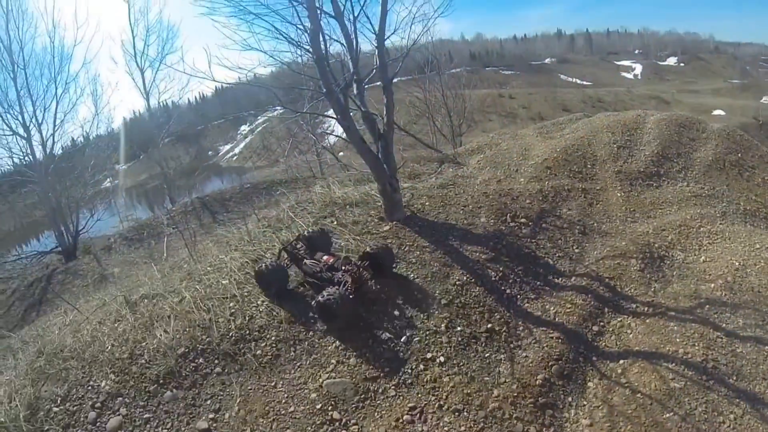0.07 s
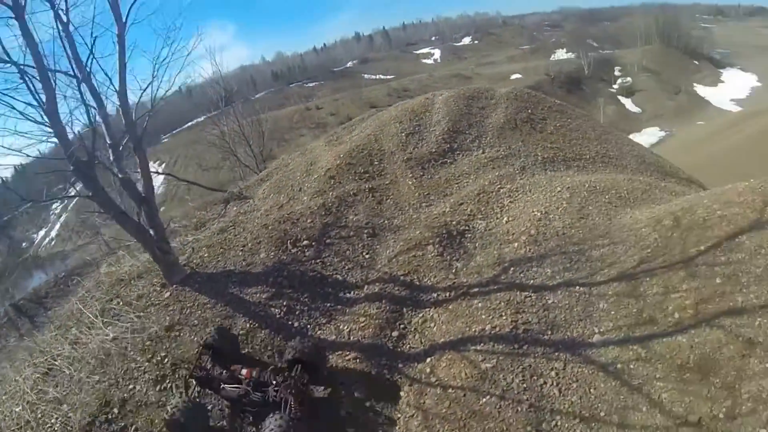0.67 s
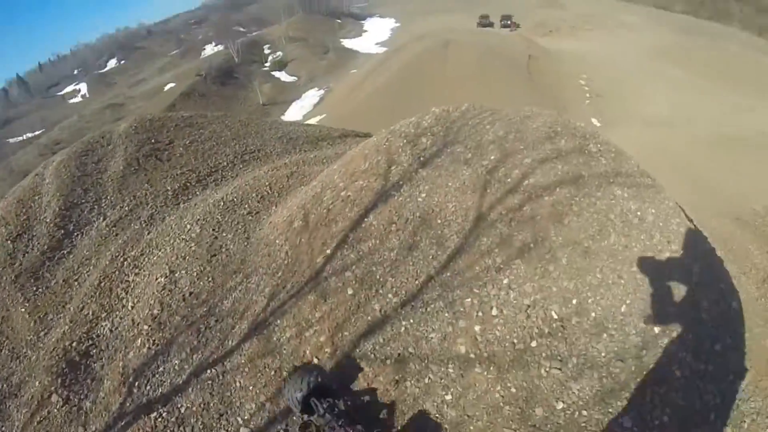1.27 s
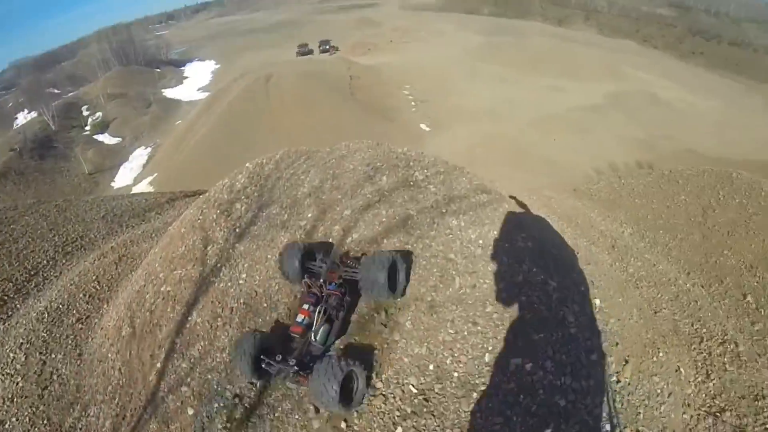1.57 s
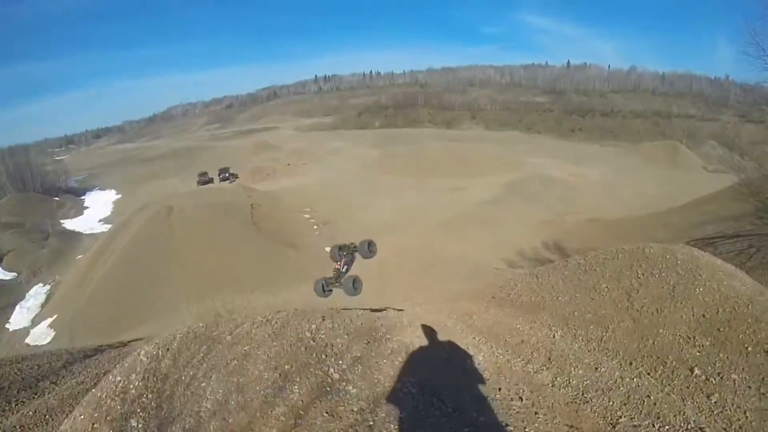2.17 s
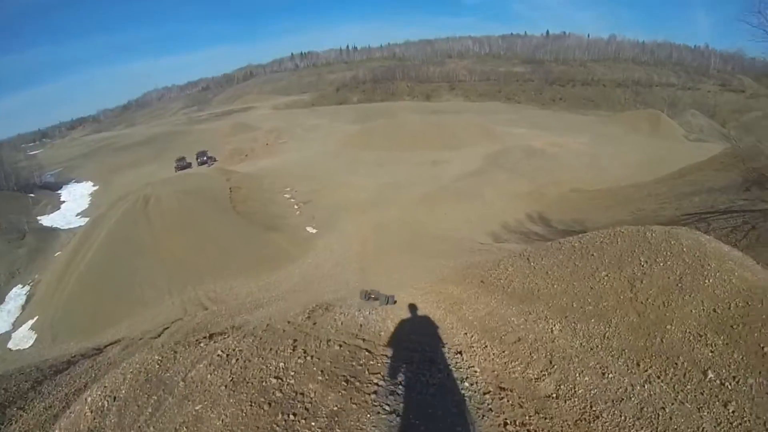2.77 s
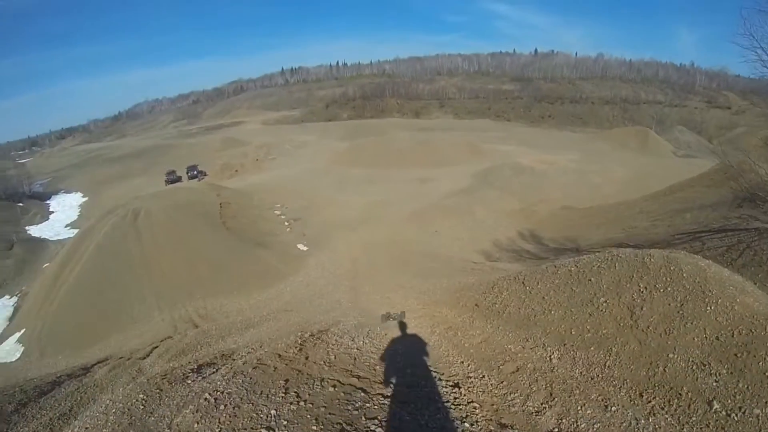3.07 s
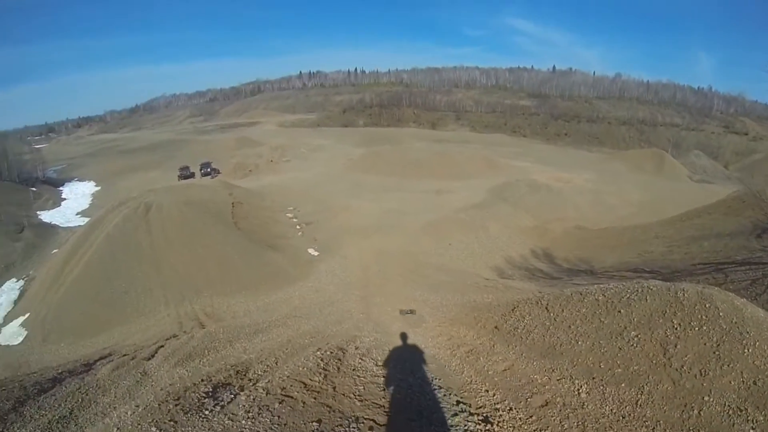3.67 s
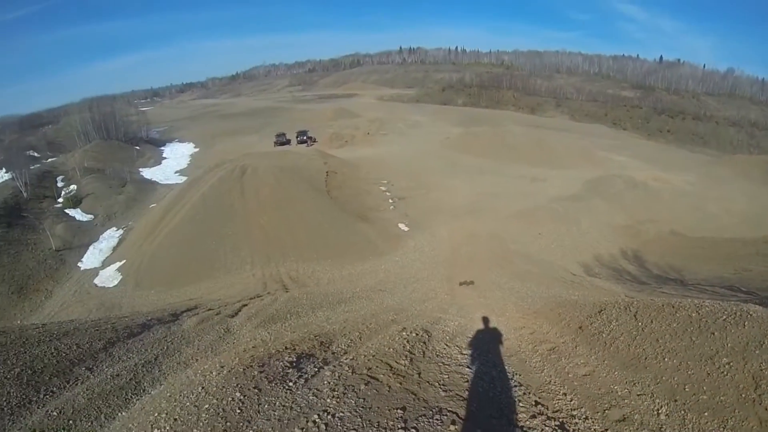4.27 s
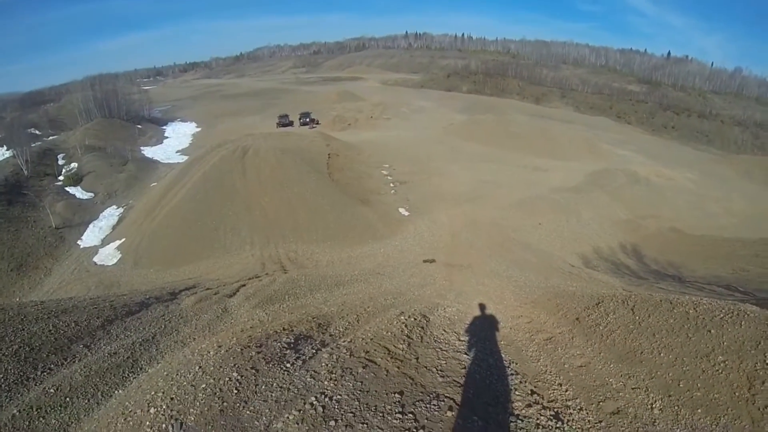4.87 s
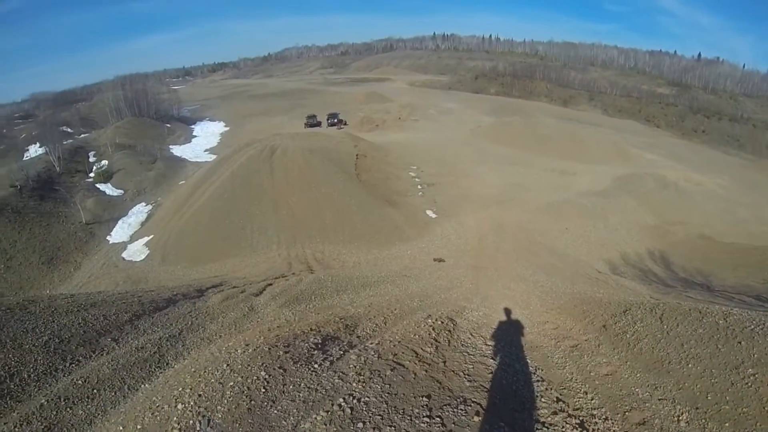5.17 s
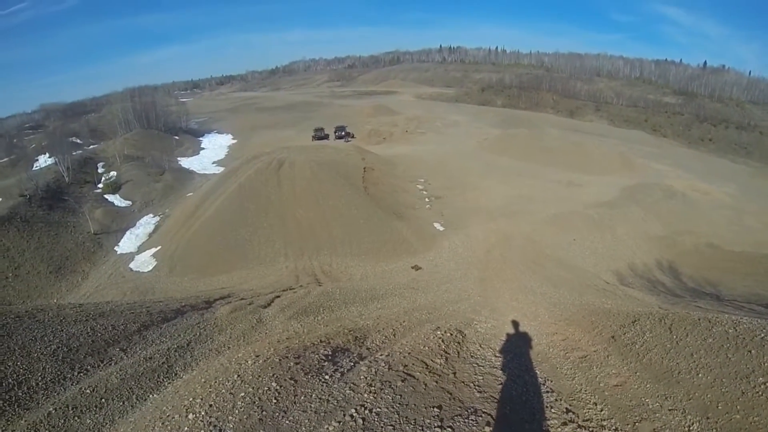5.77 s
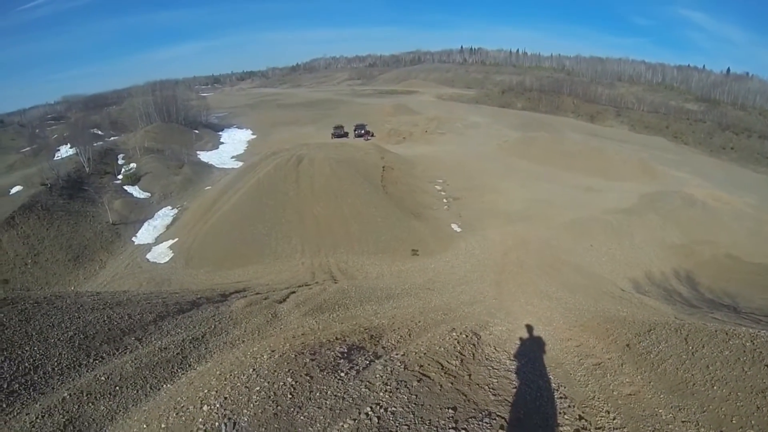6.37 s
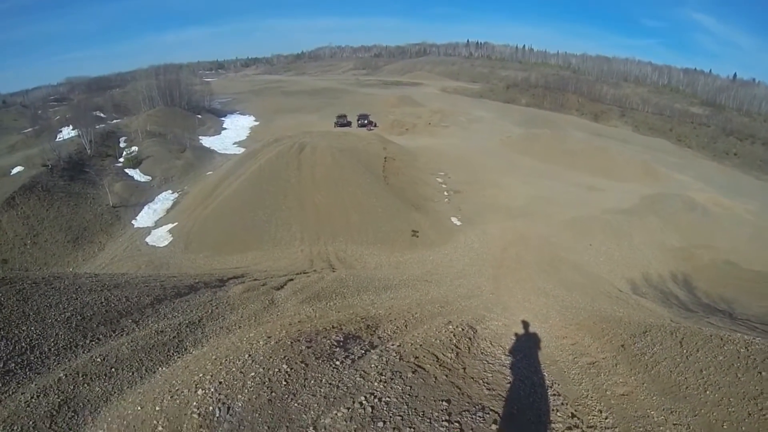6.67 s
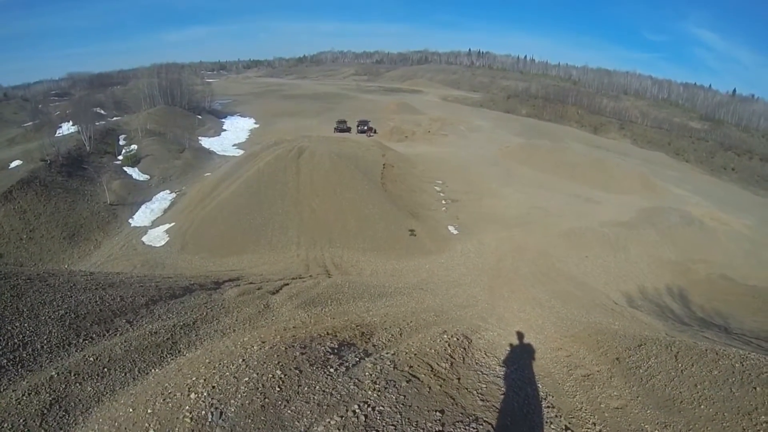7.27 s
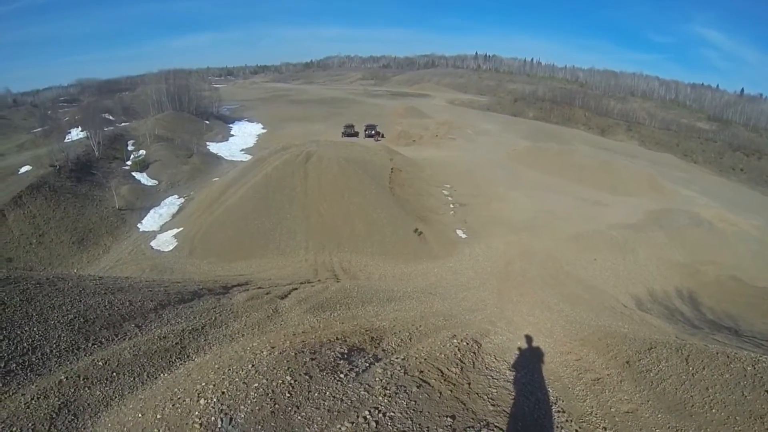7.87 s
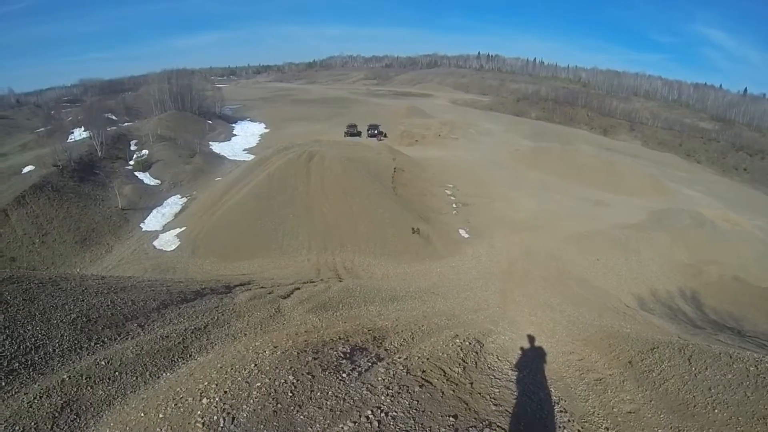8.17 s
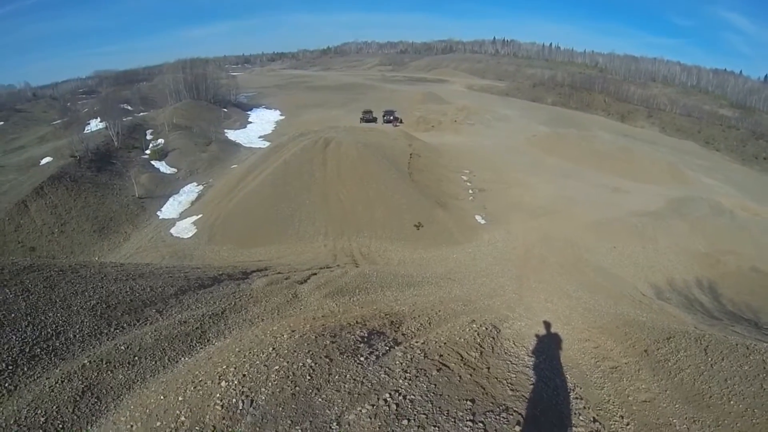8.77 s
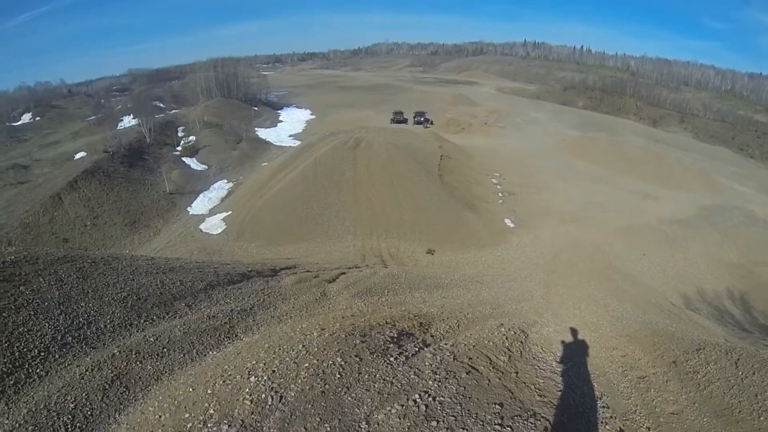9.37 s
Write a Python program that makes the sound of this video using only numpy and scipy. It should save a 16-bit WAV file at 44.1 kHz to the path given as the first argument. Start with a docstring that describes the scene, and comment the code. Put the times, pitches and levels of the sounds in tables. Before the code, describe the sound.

A small electric model truck whines and rattles over gravel, jumps, then revs far off amid microphone knocks and wind.

```python
"""A sand pit: a small electric model truck climbs a gravel mound beside a body-worn camera, jumps,
and drives on far off. Its gears whine and rattle through the camera's ringing plastic case; its tyres
churn gravel and spray grit. Knocks and clicks reach the case from its mount, wind rumbles on it,
and the electronics buzz faintly."""
import sys
import numpy as np
from scipy import signal
from scipy.fft import rfft, irfft
from scipy.io import wavfile
from scipy.ndimage import uniform_filter1d

SR = 44100
rng = np.random.default_rng(int(sys.argv[2]) if len(sys.argv) > 2 else 0)


def wav_out(sig):
    """Save sig, one row per channel (or a flat mono array), as 16-bit PCM at SR to the path in sys.argv[1]."""
    wavfile.write(sys.argv[1], SR, np.round(np.clip(np.atleast_2d(sig).T, -1, 1) * 32767).astype(np.int16))


N = 415863
T = np.arange(N) / SR
TOP_HZ = 15100

# motor on the climb and jump: (time [s], gear mesh pitch before wheel drag [Hz], drive [dB])
CLIMB = [(.28, 440, -50), (.41, 710, -42), (.47, 860, -36.5), (.645, 950, -33), (.67, 1050, -36),
         (.822, 1100, -36), (.834, 1280, -31), (.93, 1420, -31), (.974, 1660, -28.5), (1.052, 1500, -30.5),
         (1.14, 1920, -22.5), (1.18, 1850, -29.5), (1.29, 1800, -26), (1.35, 1980, -29), (1.43, 1930, -23),
         (1.5, 2111, -16), (1.57, 2750, -20.5), (1.61, 3400, -28), (1.66, 4200, -22.5), (1.71, 4900, -28),
         (1.85, 4500, -39), (1.99, 4200, -29.5)]
# throttle bursts after take-off: (start [s], length [s], pitch from [Hz], pitch towards [Hz],
# time to halfway [s], drive [dB], overtone boost [dB], judder [share of speed])
REVS = [(1.99, 0.12, 4200, 1000, 0.038, -35.5, 4, .06), (2.359, 0.37, 1925, 2970, 0.11, -45, 5.5, .05),
        (5.73, 0.83, 2250, 2950, .25, -58, 6, .1), (6.365, 0.3, 2124, 1590, .11, -52.5, 7.5, 0.054),
        (7.082, .15, 1353, 1997, 0.055, -59, 3, .025), (7.319, 0.86, 1250, 3670, .35, -50, -7, .012),
        (8.414, 0.19, 1216, 1747, 0.12, -54, 4, .03), (8.732, 0.68, 1195, 2320, .175, -59, 8, .02)]


def undb(db):
    """Decibels to gain."""
    return 10 ** (np.asarray(db) / 20)


def unit(x):
    """Scale to rms 1."""
    return x / np.sqrt(np.mean(x ** 2))


def curves(table):
    """Table columns, interpolated linearly in time."""
    s, *columns = np.transpose(table)
    return [np.interp(T, s, c) for c in columns]


def during(table):
    """Soft-edged gate from a table's first time to its last."""
    return uniform_filter1d(1. * ((T >= table[0][0]) & (T <= table[-1][0])), size=800)


def swell(centre_s, length_s):
    """Half-cosine rise and fall."""
    return np.cos(np.pi * np.clip((T - centre_s) / length_s, -.5, .5))


def walk(rate_hz):
    """Smooth random wander, rms 1."""
    hold = max(int(SR / rate_hz), 2)
    steps = np.repeat(rng.standard_normal(N // hold + 1), hold)[:N]
    return unit(uniform_filter1d(steps, hold))


def grains(per_s, spread_db):
    """Dense tiny impacts, a few much larger than the rest."""
    size = undb(spread_db * np.minimum(rng.exponential(size=N), 5))
    return unit((rng.random(N) < per_s / SR) * size * rng.standard_normal(N))


def add(out, start_s, sound):
    """Mix a sound into out."""
    i = int(start_s * SR)
    out[i:i + len(sound)] += sound[:N - i]


def colour(x, points, size=8192):
    """Minimum-phase filter through (frequency [Hz], gain [dB]) points."""
    hz, db = np.transpose(points)
    bins_hz = np.maximum(np.fft.rfftfreq(size, 1 / SR), 1)
    gain = undb(np.interp(np.log(bins_hz), np.log(hz), db))
    cepstrum = irfft(np.log(gain))
    cepstrum[1:size // 2] *= 2
    cepstrum[size // 2 + 1:] = 0
    return signal.oaconvolve(x, irfft(np.exp(rfft(cepstrum))))[:len(x)]


def resonate(x, modes):
    """Parallel resonances of alternating sign: (frequency [Hz], width [Hz], gain [dB])."""
    return sum((-1) ** k * undb(db) * signal.lfilter(*signal.iirpeak(hz, hz / width_hz, fs=SR), x)
               for k, (hz, width_hz, db) in enumerate(modes))


def case(x, leak_db=-33):
    """The plastic case rings at its resonances and passes little else."""
    # air and wall modes: (frequency [Hz], width [Hz], gain [dB])
    modes = [(1341, 116, 5), (1468, 93, 7), (1583, 92, 4), (1808, 143, -4.5), (2130, 190, -17),
             (2284, 630, -20), (2720, 160, -19.5), (3265, 270, -19), (3840, 330, -16), (4054, 274, -13),
             (4327, 200, -18.5), (5730, 1000, -22), (6210, 160, -24), (7600, 340, -49), (9900, 650, -40)]
    return resonate(x, modes) + undb(leak_db) * x


def electronics(hiss_db=-67, frame_hz=59.94, on_s=.007):
    """Steady hiss and a thin whistle that restarts with each camera frame."""
    # whistle partials: (frequency [Hz], level [dB])
    partials = [(5715, -68.7), (11430, -81.5)]
    # hiss spectrum: (frequency [Hz], density [dB])
    hiss_shape = [(100, 11), (500, 10), (1000, 7), (1500, -4), (2100, 2.5), (4200, -2.5), (6700, -4.5),
                  (7800, -26), (9800, -11.5), (11300, -10.5), (12500, -32), (15000, -47)]
    in_frame_s = T % (1 / frame_hz)
    gate = uniform_filter1d(1. * (in_frame_s < on_s), size=80)
    drift_rad = .75 * walk(30)
    whistle = sum(undb(db) * np.sin(2 * np.pi * hz * in_frame_s + drift_rad) for hz, db in partials)
    return gate * whistle + undb(hiss_db) * unit(colour(rng.standard_normal(N), hiss_shape))


def wind(rumble_db=1, buffet_db=-12, flutter_db=3):
    """Slow eddies rumble on the case; quicker ones buffet it, most in gusts."""
    # breeze: (time [s], level [dB])
    levels = [(0, -52.5), (.9, -42.5), (1.5, -47.5), (2.1, -43), (3.3, -46), (4.4, -45), (5.9, -49.5),
              (6.7, -45.5), (7.1, -50.5), (7.7, -51.5), (8.5, -43), (9.43, -49.5)]
    # gusts: (centre [s], length [s], rumble [dB], buffeting [dB])
    gusts = [(0.863, 0.24, -44, -51), (1.104, 0.11, -43, -40), (1.71, 0.66, -50, -48),
             (1.99, 0.34, -34, -45), (2.31, .1, -36, -55), (2.664, 0.4, -31.5, -39),
             (3.51, 0.15, -47, -45.5), (6.62, 0.41, -56.5, -49.5), (7.957, 0.13, -46, -46)]
    # eddy spectra: (frequency [Hz], density [dB])
    rumble_shape = [(8, -6.5), (22, 3), (40, -8), (70, -17), (130, -20.5), (300, -70)]
    buffet_shape = [(40, -16), (80, -6.5), (140, 1.5), (240, -2.5), (330, -12), (450, -19.5), (800, -30.5),
                    (1500, -58.5)]
    breeze = undb(curves(levels)[0])
    rumble, buffet = breeze * undb(rumble_db), breeze * undb(buffet_db)
    for s, length_s, low_db, high_db in gusts:
        gust = swell(s, length_s)
        rumble = np.hypot(rumble, undb(low_db) * gust)
        buffet = np.hypot(buffet, undb(high_db) * gust)
    low = unit(colour(rng.standard_normal(N), rumble_shape)) * rumble * undb(flutter_db * walk(9))
    high = unit(colour(rng.standard_normal(N), buffet_shape)) * buffet * undb(flutter_db * walk(25))
    return low + high


def sizzle(hz=7750, width_hz=650):
    """A faint, narrow band of high hiss."""
    # sizzle: (time [s], level [dB])
    levels = [(2.2, -77), (2.4, -75), (3.3, -80.5), (3.6, -77), (6.3, -80)]
    return unit(resonate(grains(1500, 3.5), [(hz, width_hz, 0)])) * undb(curves(levels)[0])


def knocks(clack_s=.001, ring_s=.013, ring_db=-12):
    """Each knock pushes the mount into a short boom; the case clacks and rings."""
    # soft knocks: (time [s], thud peak [dB], push length [ms], clack peak [dB])
    hits = [(0.373, -29.5, 3.4, -39), (.378, -20.5, 11, -33.5), (0.736, -25.5, 3, -54),
            (0.747, -25, 11.2, -44), (1.082, -28, 6.4, -53), (1.205, -35, 9.9, -60), (1.802, -8, 4.9, -25),
            (1.983, -20, 7.8, -43), (2.153, -22, 8, -43), (2.187, -28, 3.5, -46),
            (2.564, -12.5, 8.4, -30.5), (2.644, -17.5, 6.4, -28), (3.498, -13, 4.2, -39.5),
            (3.545, -29.5, 2.6, -65), (3.713, -27, 3.5, -47), (3.942, -31, 5.2, -52),
            (4.081, -28.5, 5.7, -50), (4.441, -32.5, 7, -49), (4.512, -23.5, 3, -30),
            (4.521, -15.5, 6.6, -44), (4.869, -23, 3.1, -31), (4.879, -17.5, 12.2, -55),
            (6.535, -6, 4.3, -26), (6.554, -25.5, 3, -41), (6.65, -15, 2.5, -28.5), (6.804, -28, 3.8, -40),
            (6.827, -29, 5.9, -47), (7.94, -43, 3.8, -51), (8.168, -38, 5.2, -50), (8.481, -38, 2.9, -60),
            (9.15, -37, 4.5, -62), (9.311, -27, 12.2, -67)]
    # mount modes: (frequency [Hz], t60 [s], level [dB])
    modes = [(41.9, 0.21, -14.5), (79, 0.064, -10), (145, 0.063, -2.5), (218, 0.028, 6.5),
             (288, .035, -24.5), (605, 0.026, -3.5)]
    # case clack spectrum: (frequency [Hz], density [dB])
    clack_shape = [(100, 6), (400, 3), (750, -5.5), (1000, -6), (1550, 10.5), (1800, -7), (2100, -17),
                   (3800, -21), (5000, -29), (8000, -35.5), (14000, -48)]
    t, out = T[:SR // 5], np.zeros(N)
    boom = sum(undb(db - 60 * t / t60_s) * np.cos(2 * np.pi * hz * t) for hz, t60_s, db in modes)
    decay = np.exp(-t / clack_s) + undb(ring_db) * np.exp(-t / ring_s)
    for s, thud_db, push_ms, clack_db in hits:
        push = np.sin(np.pi * np.minimum(t * 1000 / push_ms, 1)) ** 2
        thud = signal.fftconvolve(push, boom)[:len(t)]
        clack = colour(rng.standard_normal(len(t)) * decay, clack_shape)
        add(out, s, undb(clack_db) * clack / abs(clack).max() - undb(thud_db) * thud / abs(thud).max())
    return out


def clicks(crack_s=.0019, ring_gain=1.26):
    """Small hard contacts on the plastic: a crack and a brief ring."""
    # contacts: (time [s], peak [dB], relative case ring [dB])
    hits = [(1.962, -30, -6), (1.966, -29, -6), (1.971, -21.5, -14), (2.034, -26, -11), (2.149, -30.5, -12),
            (2.175, -40, -16), (2.528, -35, -7), (2.541, -32.5, 8), (2.579, -34, 7), (2.634, -31, 20),
            (2.65, -22.5, 6), (2.661, -18.5, 3), (2.669, -20, -10), (2.677, -34, 11), (2.717, -33, 6),
            (2.732, -24, -13), (2.737, -11, -2), (2.809, -35.5, 2), (2.9194, -24, -8), (2.933, -35, 1),
            (2.942, -32.5, 2), (3.055, -41.5, 12), (3.669, -37.5, -1), (4.338, -40.5, 10), (4.891, -39, 8)]
    # crack spectrum: (frequency [Hz], density [dB])
    crack_shape = [(150, 12.5), (500, 9.5), (1000, 6), (1550, 14), (2100, -4), (3200, 2.5), (4200, -1.5),
                   (5200, -8), (7800, -8), (12000, -22), (15500, -25)]
    t, out = T[:SR // 16], np.zeros(N)
    for s, peak_db, ring_db in hits:
        crack = rng.standard_normal(len(t)) * np.exp(-t / crack_s)
        click = colour(crack, crack_shape) + ring_gain * undb(ring_db) * case(crack)
        add(out, s, undb(peak_db) * click / abs(click).max())
    return out


def backlash(top_hz=6500):
    """Loose gear teeth tick densely and ring the case."""
    ticks = case(grains(3000, 2.3))
    return unit(signal.lfilter(*signal.butter(2, top_hz, fs=SR), ticks))


def far_truck(sand_trim_db=-7, bump_db=2):
    """Far off, tyres and gearbox blur into a soft rasp that swells in each skid."""
    # rolling in the pit: (time [s], churning sand [dB], gearbox rattle [dB])
    levels = [(2.25, -68, -66.5), (2.42, -53, -54), (2.95, -62, -59.5), (3.3, -65.5, -65.5),
              (3.62, -63, -66.5), (4.3, -64, -69.5), (5.6, -67, -69), (6.45, -63.5, -62.5),
              (6.75, -71, -68.5), (7.8, -65, -63), (7.95, -63.5, -57), (8.1, -64.5, -63.5),
              (8.65, -75, -64.5), (9.2, -68, -60.5), (9.46, -78, -65)]
    # skids: (centre [s], length [s], level [dB])
    skids = [(5.754, 0.041, -68), (5.82, 0.037, -66), (6.031, 0.069, -70), (6.13, 0.1, -69),
             (6.379, 0.077, -70), (9.365, 0.25, -62)]
    # sand spectrum: (frequency [Hz], density [dB])
    sand_shape = [(1000, -44), (2100, 6.5), (2800, 10), (3500, 8), (4150, 10.5), (4900, 2), (6500, -2.5),
                  (9000, -14.5)]
    sand_db, rattle_db = curves(levels)
    skidding = sum(undb(db) * swell(s, length_s) for s, length_s, db in skids)
    rasp = unit(colour(grains(5000, 1), sand_shape)) * (undb(sand_db + sand_trim_db) + skidding)
    return (rasp + backlash() * undb(rattle_db)) * undb(bump_db * walk(30)) * during(levels)


def near_truck(churn_trim_db=-5.5, bump_db=2, spray_db=-58.5, spray_flutter_db=3):
    """Close by, tyres churn gravel and fling grit; loose gear teeth rattle."""
    # the pass: (time [s], churning gravel [dB], gearbox rattle [dB])
    levels = [(0, -57, -53), (.15, -62, -55.5), (.36, -49, -43.5), (.46, -52.5, -50.5), (.7, -48.5, -45.5),
              (1.0, -44.5, -41.5), (1.1, -42, -34.5), (1.42, -42, -45.5), (1.58, -37.5, -38),
              (1.65, -36.5, -31.5), (1.72, -35.5, -34.5), (1.88, -46, -40.5), (2.06, -40.5, -39),
              (2.13, -52.5, -56), (2.25, -70, -67)]
    # handfuls of grit: (centre [s], length [s], level [dB])
    flings = [(1.067, 0.039, -52.5), (1.353, 0.023, -47.5), (1.43, 0.067, -60), (1.642, 0.5, -55.5),
              (1.964, 0.025, -38.5), (2.012, .03, -52)]
    # gravel and grit spectra: (frequency [Hz], density [dB])
    gravel_shape = [(300, -21), (700, -3.5), (1050, 3), (1800, 12.5), (2100, -24), (2700, 6), (3400, -0.5),
                    (4100, -2.5), (4900, -11.5), (6300, -13), (7200, -24), (9000, -20.5)]
    grit_shape = [(3000, 9), (5000, 7.5), (6500, 6), (8500, 0), (9800, -16), (10600, -1), (11400, 2),
                  (12500, -9), (14200, -5), (16000, -28)]
    churn_db, rattle_db = curves(levels)
    gravel = unit(colour(grains(6000, 2.2), gravel_shape)) * undb(churn_db + churn_trim_db)
    growth_db = 1.6 * (churn_db + 43.5)  # spray grows faster than churning
    spray = undb(spray_db + growth_db + spray_flutter_db * walk(30.1))
    spray += sum(undb(db) * swell(s, length_s) for s, length_s, db in flings)
    grit = unit(colour(grains(4000, 2.1), grit_shape)) * spray
    rattle = backlash() * undb(rattle_db)
    return (gravel + grit + rattle) * undb(bump_db * walk(45.29)) * during(levels)


def throttle(start_s, length_s, attack_s=.045, release_share=.306):
    """Attack, hold and release of one burst."""
    attack = np.clip((T - start_s) / attack_s, 0, 1)
    release = np.clip((start_s + length_s - T) / (release_share * length_s), 0, 1)
    return attack * release


def gearbox_ring(hz=4130, width_hz=330, ring_db=-74, flutter_db=3):
    """In throttle bursts the teeth keep a raspy ring going."""
    effort = sum(throttle(s, length_s) for s, length_s, *_ in REVS)
    mode = [(hz, width_hz, 0)]
    ring = unit(resonate(resonate(grains(3000, 2.3), mode), mode))
    return ring * effort * undb(ring_db + flutter_db * walk(25))


def motor_can(can_db=-34, flutter_db=3):
    """On the climb the motor's metal can rings thinly, as hard as the gears are driven."""
    # can modes: (frequency [Hz], width [Hz], gain [dB])
    modes = [(5450, 220, 6), (6300, 250, 6), (8050, 300, -18.5), (9670, 400, 4.5), (11120, 400, -13)]
    _, drive_db = curves(CLIMB)
    ring = unit(resonate(grains(5000, 2.8), modes))
    return ring * undb(drive_db + can_db + flutter_db * walk(24.6)) * during(CLIMB)


def windings(hz=1505, second_db=-2, waver_db=1.5):
    """Switched current makes the motor windings sing at one pitch while the truck creeps."""
    # winding tone: (time [s], level [dB])
    levels = [(0, -54), (.12, -51), (.22, -47), (.35, -43), (.4, -52)]
    phase = 2 * np.pi * hz * T
    tone = np.sin(phase) + undb(second_db) * np.sin(2 * phase)
    return np.sqrt(2) * tone * undb(curves(levels)[0] + waver_db * walk(30)) * during(levels)


def slopes(x, scatter_db=-8, t60_s=.073):
    """Sandy slopes scatter a distant sound into a short tail."""
    t = T[:SR // 2]
    tail = rng.standard_normal(len(t)) * undb(-60 * t / t60_s)
    return x + undb(scatter_db) * signal.fftconvolve(x, tail / np.linalg.norm(tail))[:N]


def ground_bounce(x, lag_ms=2.6, sway=.11, gain=.33):
    """The ground reflection's path changes as the truck bounces, breaking up the whine."""
    lag_s = lag_ms / 1000 * (1 + sway * walk(24))
    return x + gain * np.interp(T - lag_s, T, x)


def wheel_drag(judder, judder_hz=70):
    """Motor speed factor: each wheel bite slows it briefly; stones make it judder."""
    # wheels biting the ground: (time [s], speed lost [share], slowing [s], recovery [s])
    bites = [(.888, .14, .016, .022), (0.958, .17, .025, .015), (1.012, 0.44, .04, .04),
             (1.075, .28, .022, .035), (1.156, .29, .014, .05), (1.215, .15, .05, .07),
             (1.31, 0.23, .022, 0.036), (1.36, .23, .011, 0.027), (2.41, 0.36, .026, 0.029),
             (5.829, 0.18, .02, .035), (6.151, 0.4, .03, .05), (6.412, 0.35, .026, .06),
             (6.505, 0.23, .026, .06), (6.62, 0.17, .026, 0.12), (8.15, .17, .2, .1)]
    dips = [np.interp(T, [s - slowing_s, s, s + recovery_s], [1, 1 - lost, 1])
            for s, lost, slowing_s, recovery_s in bites]
    return np.prod(dips, axis=0) * (1 + judder * walk(judder_hz))


def gears(mesh_hz, drive, jitter, rough, chatter_flutter_db, overtone_db):
    """Meshing teeth whine, uneven teeth chatter; slipping wheels shake speed and load."""
    # mesh harmonics 1-4: (level [dB])
    harmonics_db = [0.5, -3.5, -10.5, -19]
    # shaft harmonics from uneven teeth: (frequency [x mesh pitch], level [dB])
    chatter = [(.37, -18), (.75, -25), (.92, -18.5), (1.08, -17), (1.25, -21), (1.748, -14.5), (1.921, -13),
               (2.08, -10.5), (2.249, -17.5), (2.502, -13), (2.749, -14.5), (3.499, -10.5), (3.751, -19),
               (4.497, -23), (5.25, -18), (6, -16.5)]
    # air and ground dull the whine with distance: (time [s], low-pass corner [Hz])
    corners = [(1.5, 11050), (2.4, 4980), (6, 4240)]
    slip = 1 + .016 * walk(150)
    load = undb(3 * walk(150) - 1.5)
    speed = slip + jitter * walk(1100)
    shake = load * (1 + rough * walk(900))
    partials = [(k, undb(db + overtone_db * (k > 1)) * shake) for k, db in enumerate(harmonics_db, 1)]
    partials += [(k, undb(db + chatter_flutter_db * walk(70))) for k, db in chatter]
    corner_hz = curves(corners)[0]
    out = np.zeros(N)
    on = drive > 1e-6
    phase = 2 * np.pi * np.cumsum((mesh_hz * speed)[on]) / SR
    for k, gain in partials:
        hz = k * mesh_hz[on]
        lowpass = (hz < TOP_HZ) / np.sqrt(1 + (hz / corner_hz[on]) ** 10)
        out[on] += np.sqrt(2) * np.sin(k * phase) * gain[on] * lowpass * drive[on]
    return out


def revs(bounce_db=3):
    """In each throttle burst the motor eases from one speed towards another."""
    # tone colour of the revving whine, brightest near 2.2 and 4.2 kHz: (frequency [Hz], gain [dB])
    rev_shape = [(800, -7), (1300, 0), (1550, -5.5), (1850, 5.5), (2200, 13.5), (2550, 2.5), (3100, -4.5),
                 (3600, 5), (4200, 8.5), (5200, -1)]
    hz, drive, overtone_db, judder = np.zeros((4, N))
    for s, length_s, from_hz, to_hz, half_s, drive_db, boost_db, judder_share in REVS:
        begun = T >= s
        ease = ((T - s) / half_s) ** 2
        hz = np.where(begun, from_hz + (to_hz - from_hz) * ease / (1 + ease), hz)
        overtone_db[begun], judder[begun] = boost_db, judder_share
        drive += undb(drive_db) * throttle(s, length_s)
    hz *= wheel_drag(judder)
    drive *= undb(bounce_db * walk(30))
    whine = gears(hz, drive, jitter=.019, rough=.1, chatter_flutter_db=4, overtone_db=overtone_db)
    return colour(whine, rev_shape)


def climb(slip_db=2.5, slip_hz=91.2):
    """The motor winds up the mound, checked by each bite, races at take-off and coasts in the air."""
    hz, drive_db = curves(CLIMB)
    slip_dips = undb(-slip_db * np.maximum(walk(slip_hz), 0) ** 2)
    drive = undb(drive_db) * slip_dips * during(CLIMB)
    hz *= wheel_drag(judder=.016)
    return gears(hz, drive, jitter=.015, rough=.17, chatter_flutter_db=5, overtone_db=2.5)


def scene():
    """Truck, wind and the camera's own sounds at one microphone."""
    whine = case(ground_bounce(climb()) + windings() + slopes(revs()))
    truck = whine + motor_can() + gearbox_ring() + near_truck() + far_truck()
    return (truck + sizzle() + knocks() + clicks() + wind() + electronics())[None]


def record(dry):
    """Steep low-pass at TOP_HZ."""
    return signal.sosfilt(signal.ellip(8, .2, 70, TOP_HZ, fs=SR, output="sos"), dry)


dry = scene()
out = record(dry)
wav_out(out)
```